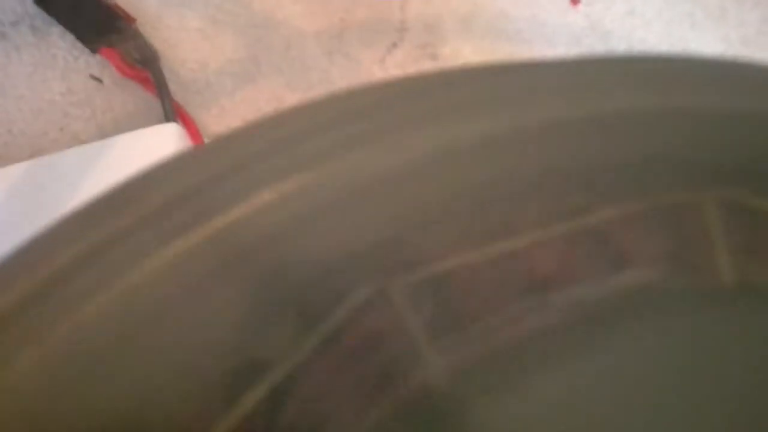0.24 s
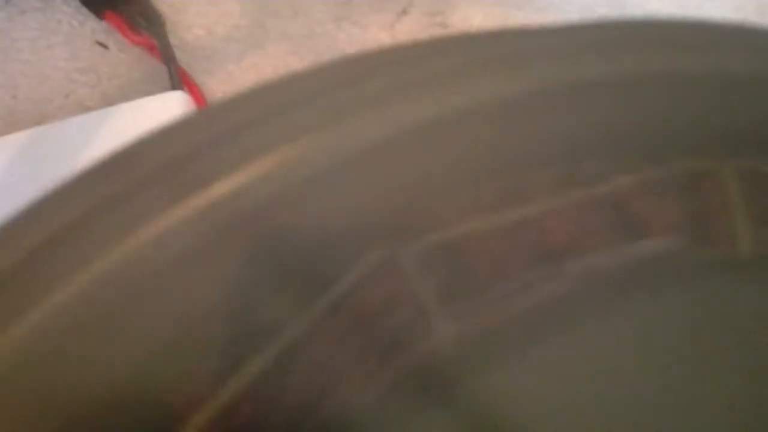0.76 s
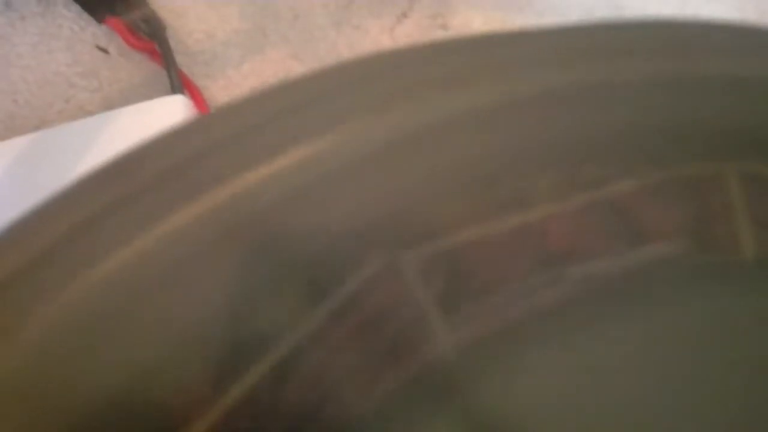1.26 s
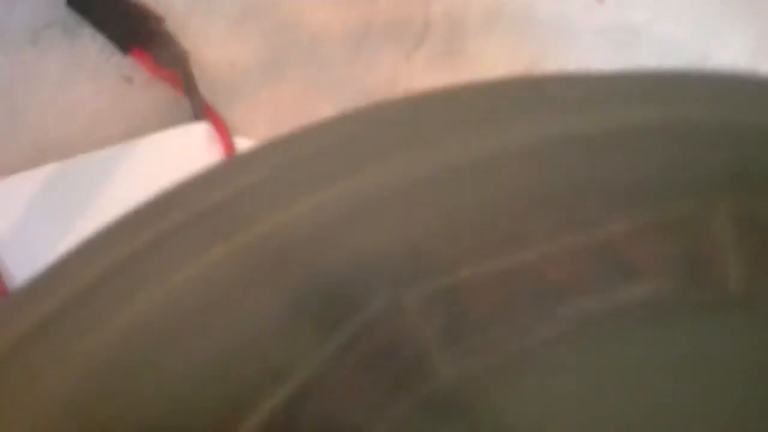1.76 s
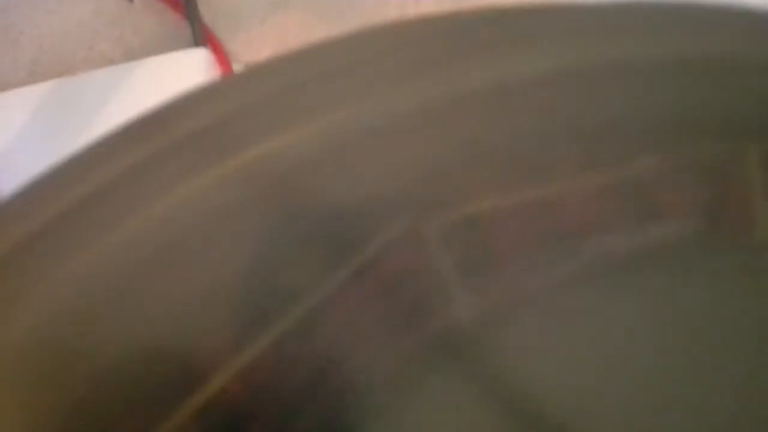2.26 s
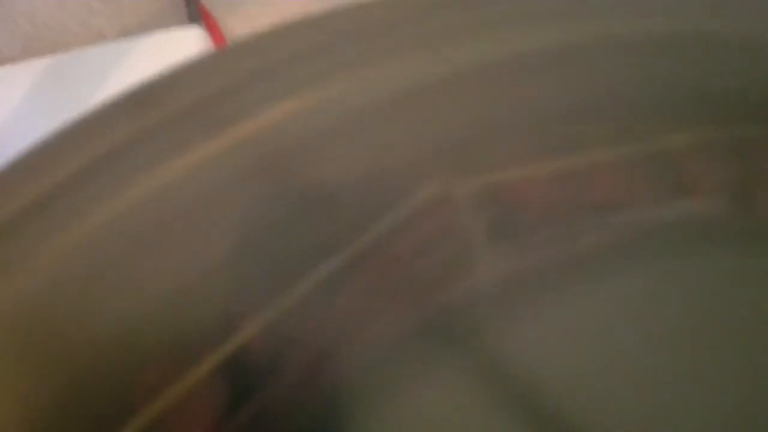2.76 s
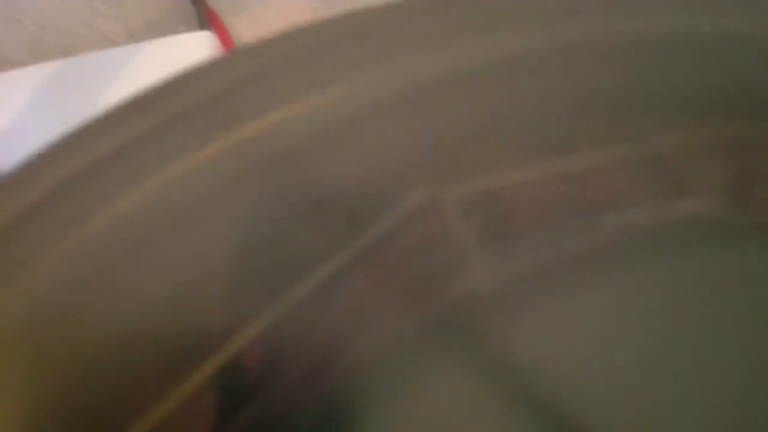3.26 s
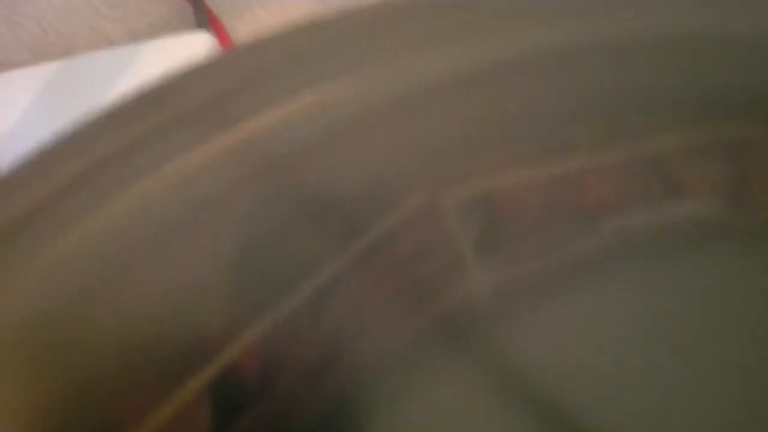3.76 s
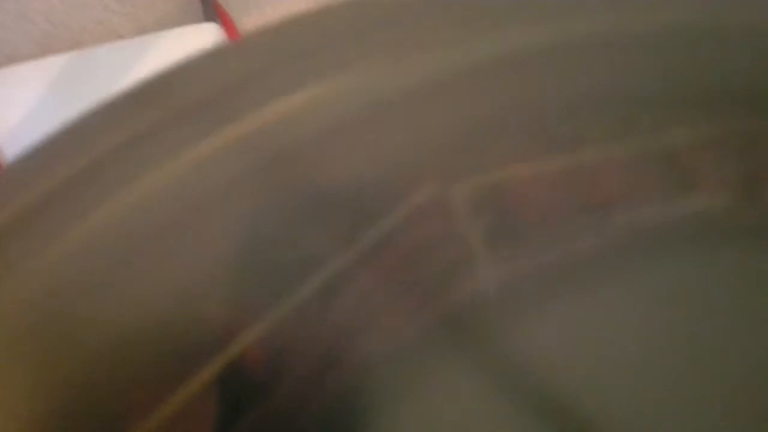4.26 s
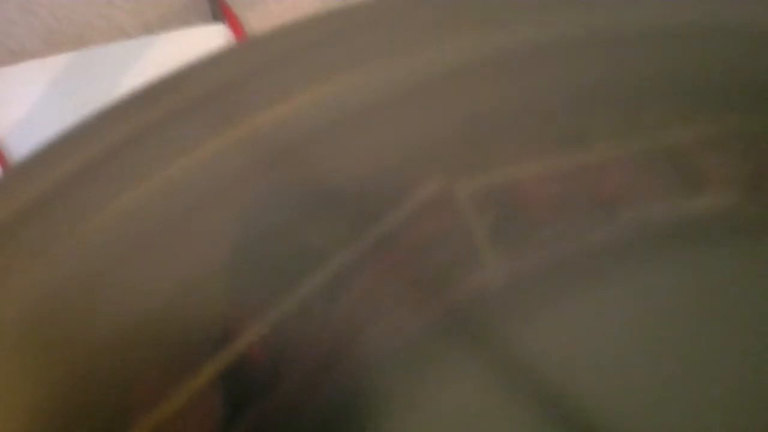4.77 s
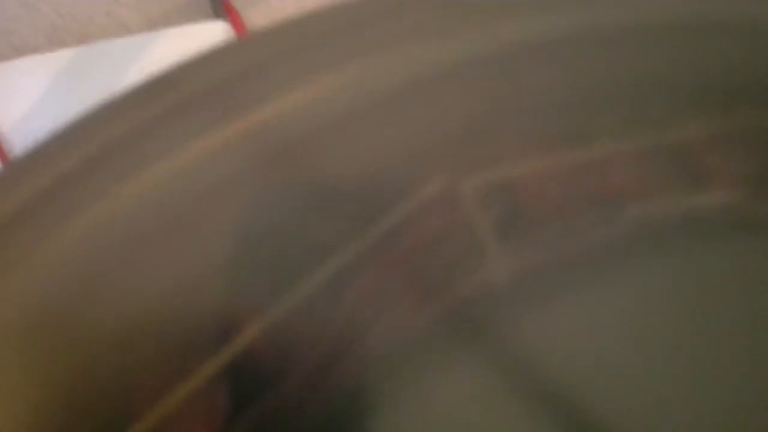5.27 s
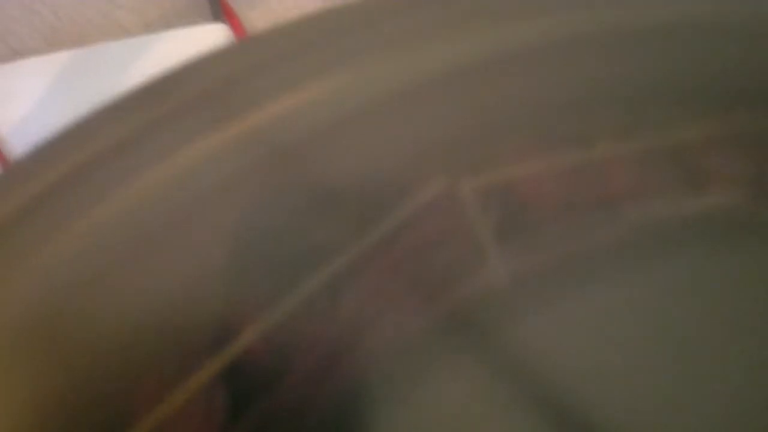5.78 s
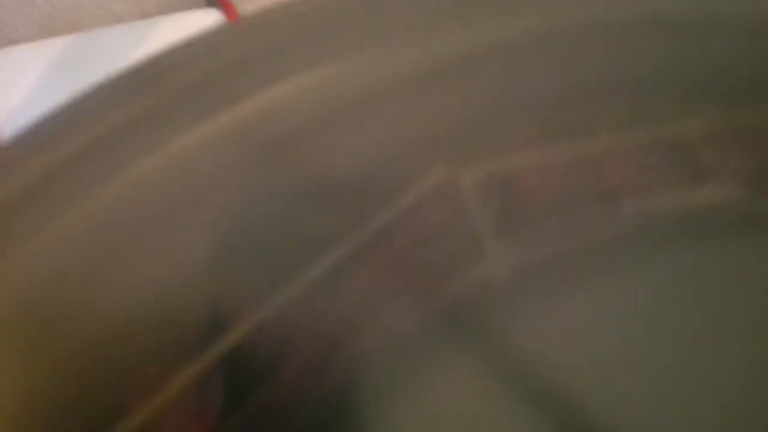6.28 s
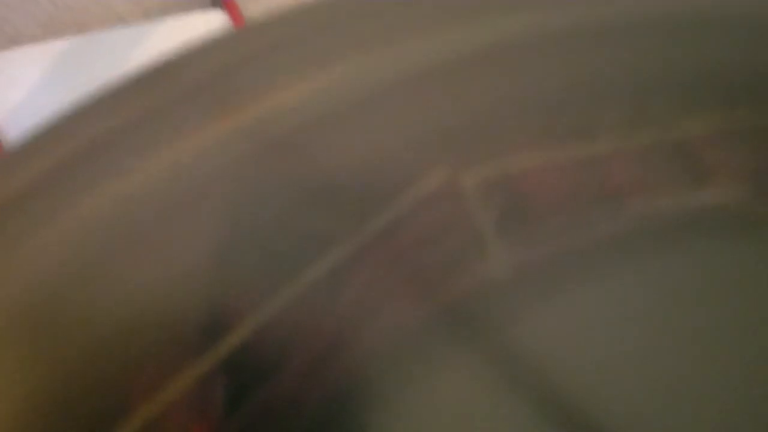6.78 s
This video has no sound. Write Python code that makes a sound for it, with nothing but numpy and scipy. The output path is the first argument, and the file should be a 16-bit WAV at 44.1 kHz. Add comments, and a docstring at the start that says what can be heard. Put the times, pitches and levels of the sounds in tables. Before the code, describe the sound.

An electric hub motor spins freely in a room, close to the microphone. Its buzzing whine climbs in pitch, with a thin, very high squeal above it. Light knocks and scrapes repeat with every turn and quicken as the wheel gathers speed. After a harder push the squeal fades, and the motor holds a steady high whine over a rush of bearings and air.

```python
"""A hub motor spins freely in a room, close to a mono microphone: it gathers speed, is pushed harder, then holds top speed.
Its magnets whine and buzz through the ringing side cover, and the controller squeals until top speed is reached.
The wheel knocks and scrapes at the same angles in every turn, over a rush of bearings and air."""
import sys
import numpy as np
from scipy import signal
from scipy.fft import rfft, irfft, next_fast_len
from scipy.io import wavfile
from scipy.ndimage import map_coordinates

SR = 44100
rng = np.random.default_rng(int(sys.argv[2]) if len(sys.argv) > 2 else 0)


def materialize(psi):
    """Save the field psi as 16-bit PCM at rate SR to the path in sys.argv[1].

    A 1-D psi becomes a single channel; in a 2-D psi each row is a channel.
    """
    bounded = np.clip(np.atleast_2d(psi).T, -1, 1)
    quanta = np.round(bounded * 32767).astype(np.int16)
    wavfile.write(sys.argv[1], SR, quanta)


N = 310023

# speed of the wheel, steady after the last row: (s, turns a second)
SPEED = [(0, 3.904), (.335, 4.177), (.635, 4.4), (1.382, 5.366), (1.551, 5.518), (1.7, 5.78), (1.836, 5.938),  # fixed
         (2.266, 6.11), (2.439, 6.534), (2.532, 7.164), (2.64, 7.673), (2.772, 8.082), (2.95, 8.565), (3.214, 9.4024)]  # fixed
TOP_SPEED, MAGNETS = SPEED[-1][1], 46  # fixed
# magnet whine from the 2nd harmonic of the magnet rate up:
# (dB at top speed, power of speed by which it grows, loudest angle in turns, swing over a turn dB)
WHINE = [(-41, 1.6, 0.7, 5.5), (-54, -1.6, 0.2, 4.5), (-35, 2.5, 0.37, -0.54), (-45, 1.06, 0.42, 2.5)]
# cogging tones at top speed: (cycles a turn, dB, loudest angle in turns, swing over a turn dB)
COGGING = [(46, -42, 0.16, -1), (92, -35.5, 0.69, 4), (101, -30, .3, 0.5), (151.26, -25, 0.066, 2.5), (154.4, -28, .67, 2), (321.8, -38, .68, -5), (325, -35, 0.69, 42),
           (410.6, -38, .55, 18), (414.8, -34, .76, 2), (460, -43, .9, 9)]
# side cover resonances: (Hz, half width Hz, dB)
COVER = [(494, 66, -1.5), (945, 290, -10), (1357, 114, 9), (2160, 240, -1), (3370, 1060, -2), (4080, 1100, -11), (4930, 384, -1.5), (6720, 460, -5.5),
         (7720, 420, 4), (9220, 660, -5), (11060, 2000, -14.5), (13300, 470, -11)]
# knocks in every turn: (angle in turns, thud dB, tick dB)
KNOCKS = [(.124, .3, -22), (.203, -15, -16), (.425, -14, -25), (.542, -13, -20), (.562, -16, -19)]  # fixed
# what a knock rings with: (Hz, dB, t60 s)
SHELL = [(930, 1, .014), (1285, 7.5, .019), (1400, -3, .017)]  # fixed
# rubbing spots: (angle in turns, length in turns, Hz, half width Hz, dB, power of speed by which it grows)
SCRAPES = [(0.2, 0.079, 1350, 80, -28.5, -0.6), (0.51, 0.46, 1410, 101, -37.5, 0.4), (0.06, 0.027, 7870, 110, -21.5, 1.5), (0.234, 0.018, 7980, 200, -24, 0.5),
           (0.42, 0.023, 7680, 320, -20.5, 0.5), (0.48, 0.044, 7000, 150, -27.5, 2), (0.55, 0.034, 9150, 100, -31, 3), (0.74, 0.03, 8250, 120, -26, 2),
           (0.745, 0.025, 3370, 150, -24, 1), (0.92, 0.13, 7410, 73, -31, 2.9), (0.9, 0.18, 13200, 1200, -41, 4)]
# bearings and air: (Hz, dB per Hz)
RUSH = [(25, -47), (60, -46), (130, -28), (190, -17), (280, -16), (450, -4.5), (700, 2), (950, 5), (1130, 1.5), (1350, 4), (1800, -8.5),
        (2600, -5.5), (4500, -13.5), (15000, -40)]
ROOM = [(200, 0.13), (2000, 0.2), (12000, 0.04)]  # (Hz, t60 s)
CUT_HZ = 15800  # fixed
# sharp cover modes, fed by every third harmonic of the magnet rate: (Hz, half width Hz, dB re the buzz, first and last harmonic)
WHISTLES = [(253, 9.5, -22, 1, 1), (1340, 170, -9.5, 6, 6), (1270, 220, -14.5, 7, 7), (2340, 290, -16.5, 6, 6), (2700, 580, -16, 7, 10),
            (3140, 210, -11, 10, 16), (3526, 193, -6.5, 9, 9), (3130, 300, -17, 8, 8), (4920, 250, -16.5, 12, 12),
            (5050, 120, -12.5, 14, 26), (7670, 180, -3, 20, 26), (9150, 250, -14, 23, 33)]
# the still room: (Hz, dB per Hz)
FLOOR = [(25, -56), (60, -38), (90, -27), (125, -4), (170, -18), (260, 2.5), (400, 5.5), (700, 0.5), (2000, -23)]
# stator modes that the whine sweeps through: (Hz, half width Hz, dB)
STATOR = [(555, 12, 2.5), (753, 47, 13), (955, 40, 20), (1286, 105, 24), (1470, 36, 22), (1662, 79, 9), (2045, 120, 3)]
# pushes on the throttle, each drawing extra current: (s, length s, dB of extra buzz)
PUSHES = [(0.06, 0.1, 2), (2.322, .41, 3.5), (2.884, 0.27, 4.5)]
PUSH_ATTACK_S, PUSH_RELEASE_S = 0.094, 0.06
BUZZ_DB, BUZZ_GROWTH = -21, 0.42  # unloaded at top speed; power of speed by which it grows
SPIN_UP_DB = 1.4  # extra buzz while the wheel is still gathering speed
SQUEAL_DB, SQUEAL_FADE, SQUEAL_REST_DB = -24.5, 0.8, -65  # at standstill; power of the chopper's off time; what stays at top speed


def amp(db):
    return 10 ** (np.asarray(db) / 20)


def unit(x):
    return x / np.sqrt(np.mean(x ** 2) + 1e-20)


def along(points, hz):
    """(Hz, value) points on a log axis."""
    f, v = np.transpose(points)
    return np.interp(np.log(hz + 1), np.log(f + 1), v)


def curves(rows):
    """One value per sample for each column after the time."""
    s, *cols = np.transpose(rows)
    return [np.interp(np.arange(N) / SR, s, c) for c in cols]


def wobble(rate):
    """A smooth random curve, rate knots a second."""
    fine = map_coordinates(rng.standard_normal(int(N * rate / SR) + 4), [np.arange(0, N + 256, 256) * rate / SR])  # fixed
    return np.interp(np.arange(N) / 256, np.arange(len(fine)), fine)  # fixed


def filtered(x, response):
    """x times a response of frequency."""
    m = next_fast_len(N + SR // 2)
    return irfft(rfft(x, m) * response(np.fft.rfftfreq(m, 1 / SR)), m)[:N]


def hump(x, centre, width):
    """A resonance peak of height 1."""
    return 1 / (1 + ((x - centre) / width) ** 2)


def cover(hz):
    """Gain of the side cover: its resonances add in power."""
    return np.sqrt(sum((amp(db) * hump(hz, centre, width)) ** 2 for centre, width, db in COVER)) * hz ** 2 / (hz ** 2 + 350 ** 2)


def each_turn(angle, weight, count=3000, size=32768):
    """A random profile around the wheel, read again in every turn; weight sets the size of each order."""
    orders = np.arange(count)
    profile = irfft(weight(orders) * np.exp(2j * np.pi * rng.random(count)), size)
    return unit(np.interp(angle % 1, np.arange(size + 1) / size, np.append(profile, profile[0])))


def tone(angle, order, uneven, waver):
    """A line locked to the wheel, of rms 1: unequal magnets swell it within each turn, and it wavers a little."""
    swell = 1 + uneven * each_turn(angle, lambda k: hump(k, 2.24, 0.6) * (k > 0), count=16, size=1024)
    return unit(swell * np.sin(2 * np.pi * order * angle + waver * wobble(18)))


def whine(angle, pace):
    """Magnets tug at the stator teeth, each harmonic swelling as it crosses a mode; the cogging tones come out near top speed."""
    out = np.zeros(N)
    for harmonic, (db, growth, loudest, swing_db) in enumerate(WHINE, 2):
        order = harmonic * MAGNETS
        level = amp(db) * pace ** growth * stator(order * pace * TOP_SPEED)
        out += level * air_gap(angle, loudest, swing_db) * tone(angle, order, uneven=0.23, waver=0.066)
    for order, db, loudest, swing_db in COGGING:
        out += amp(db) * pace ** 7 * air_gap(angle, loudest, swing_db) * tone(angle, round(order), uneven=0.097, waver=0.083)
    return out


def buzz(angle, drive_db, spread, valley_db, snap, grit_db):
    """Current steps at every magnet shake the cover; unequal magnets spread each harmonic into a cluster."""
    from_harmonic = lambda k: (k + MAGNETS / 2) % MAGNETS - MAGNETS / 2
    steps = each_turn(angle, lambda k: hump(from_harmonic(k), 0, spread) + amp(valley_db))
    grit = filtered(rng.standard_normal(N), lambda hz: amp(grit_db) * (hz / 7000) ** 0.78)
    bursts = np.exp(snap * np.cos(2 * np.pi * MAGNETS * angle))
    return amp(drive_db - 1.69) * unit(filtered((steps + grit) * bursts, cover))


def squeal(angle, pace):
    """The controller chops the current just inside hearing, scattered into sidebands; its off time closes as the speed rises."""
    chopped = each_turn(angle, lambda k: hump(k, 0, 70), count=300) * np.sin(2 * np.pi * 15620 * np.arange(N) / SR)
    sizzle = filtered(rng.standard_normal(N), lambda hz: hump(hz, 15300, 300))
    off_time = np.clip(1 - pace, 0, 1)
    return (amp(SQUEAL_DB) * off_time ** SQUEAL_FADE + amp(SQUEAL_REST_DB)) * (unit(chopped) + 0.86 * unit(sizzle))


def knocks(angle, pace, attack, scatter_db):
    """Play in the wheel lets it knock at the same angles, harder with speed."""
    t = np.arange(SR // 20) / SR
    ring = sum(amp(db - 60 * t / t60) * np.sin(2 * np.pi * hz * t) for hz, db, t60 in SHELL) * (1 - np.exp(-t / attack)) ** 2
    thuds, ticks = np.zeros(N), np.zeros(N)
    for at, thud_db, tick_db in KNOCKS:
        hits = np.diff(np.floor(angle - at), prepend=np.floor(angle[0] - at))
        hits = hits * pace * amp(scatter_db * rng.standard_normal(N))
        thuds += amp(thud_db) * signal.oaconvolve(hits, ring)[:N]
        ticks += amp(tick_db) * signal.oaconvolve(hits, rng.standard_normal(len(t)) * amp(-60 * t / 0.022))[:N]
    # the small shell radiates no bass
    return filtered(thuds, lambda hz: hz ** 4 / (hz ** 4 + 350 ** 4)) + filtered(ticks, lambda hz: 3 * cover(hz) * hump(hz, 3460, 2260))


def scrapes(angle, pace):
    """High spots rub once a turn, each stirring one band of the cover."""
    surface = each_turn(angle, np.ones_like) + .5 * rng.standard_normal(N)
    out = np.zeros(N)
    for at, length, centre, width, db, growth in SCRAPES:
        touch = np.exp(-(((angle - at + .5) % 1 - .5) / length) ** 2 / 2)
        out += amp(db) * pace ** growth * touch * unit(filtered(surface, lambda hz: hump(hz, centre, width) * hz ** 2 / (hz ** 2 + 400 ** 2)))
    return out


def rush(angle, pace):
    """Bearings roll and the tyre stirs the air, louder with speed."""
    rolling = rng.standard_normal(N) + 0.35 * each_turn(angle, np.ones_like)
    flutter_db = .6 * wobble(10)  # fixed
    return amp(-23.5 + flutter_db) * pace ** 1.97 * unit(filtered(rolling, lambda hz: amp(along(RUSH, hz))))


def room(x):
    """The walls answer, each frequency dying at its own speed."""
    hz, t, z = signal.stft(rng.standard_normal(SR // 3), SR, nperseg=256)
    tail = signal.istft(z * amp(-60 * t / along(ROOM, hz)[:, None]), SR, nperseg=256)[1]
    return signal.fftconvolve(x, tail / np.linalg.norm(tail))[:N]


def whistles(angle, speed, drive_db, uneven):
    """As the speed climbs, one harmonic after another sweeps through each sharp mode and sings."""
    out = np.zeros(N)
    for centre, width, db, first, last in WHISTLES:
        for order in MAGNETS * np.arange(round(first), round(last) + 1, 3):  # fixed
            gain = hump(order * speed, centre, width)
            near = gain > .05  # fixed
            if near.any():
                swell = 1 + uneven * each_turn(angle[near], lambda k: hump(k, 2.5, 4.7) * (k > 0), count=16, size=1024)
                out[near] += amp(db) * gain[near] * swell * np.sqrt(2) * np.sin(2 * np.pi * (order * angle[near] + rng.random()))
    return amp(drive_db) * out


def floor():
    """The faint low rumble of the room."""
    return amp(-45.5) * unit(filtered(rng.standard_normal(N), lambda hz: amp(along(FLOOR, hz))))


def air_gap(angle, loudest, swing_db):
    """Gain of rms 1 over a turn: the gap between magnets and stator narrows at one angle."""
    return unit(amp(swing_db * np.cos(2 * np.pi * (angle - loudest))))


def stator(hz):
    """Gain of the stator: its modes stand out of a flat response."""
    return np.sqrt(1 + sum((amp(db) * hump(hz, centre, width)) ** 2 for centre, width, db in STATOR))


def drive(pace):
    """Level of the buzz in dB: it follows the current, which is high while spinning up and higher at each push."""
    t = np.arange(N) / SR
    pushes_db = sum(db * np.interp(t - s, np.cumsum([0, PUSH_ATTACK_S, abs(length - PUSH_ATTACK_S), PUSH_RELEASE_S]), [0, 1, 1, 0])
                    for s, length, db in PUSHES)
    return BUZZ_DB + BUZZ_GROWTH * 20 * np.log10(pace) + SPIN_UP_DB * np.tanh((1 - pace) / .03) + pushes_db


def scene():
    """Everything follows the speed and angle of the wheel."""
    speed, = curves(SPEED)
    angle, pace = np.cumsum(speed) / SR, speed / TOP_SPEED
    drive_db = drive(pace)
    contact = angle - .08 * (1 - pace)  # a slower wheel touches a little later in its turn
    rattle = knocks(contact, pace, attack=0.0025, scatter_db=0.3) + scrapes(contact, pace)
    rattle = rattle + buzz(angle, drive_db, spread=3.4, valley_db=-9.5, snap=0.11, grit_db=-3.5)
    tones = whine(angle, pace) + whistles(angle, speed, drive_db, uneven=0.44) + squeal(angle, pace)
    mono = rattle + amp(-10.0) * room(rattle) + tones + rush(angle, pace) + floor()
    return np.array([mono, mono])


def record(dry):
    """The recorder keeps nothing above its band limit."""
    return np.array([filtered(channel, lambda hz: hz < CUT_HZ) for channel in dry])


dry = scene()
out = record(dry)
materialize(out)
```